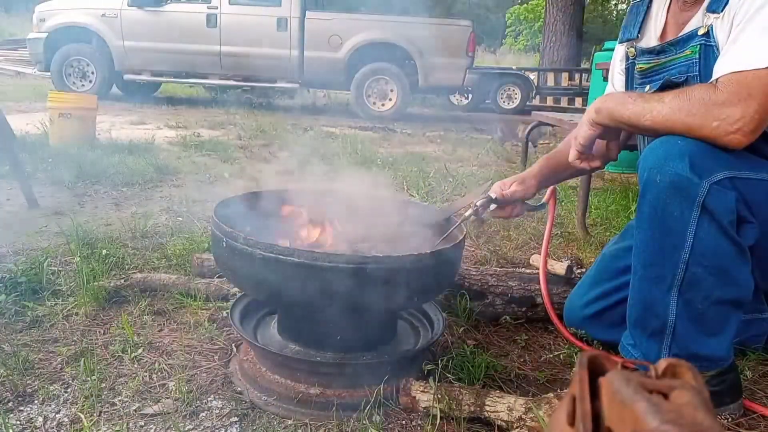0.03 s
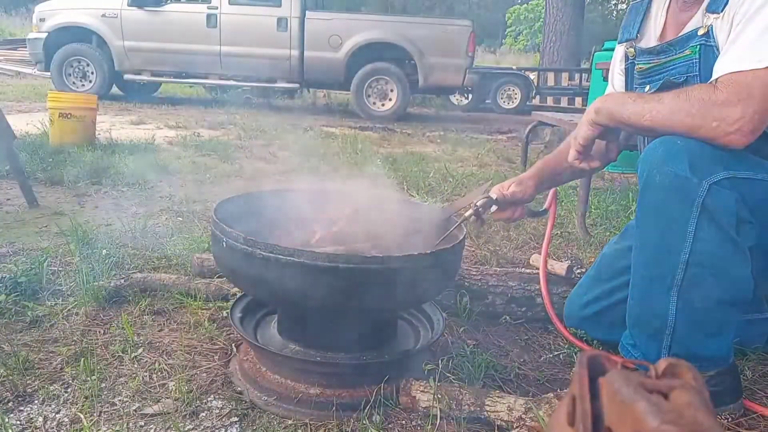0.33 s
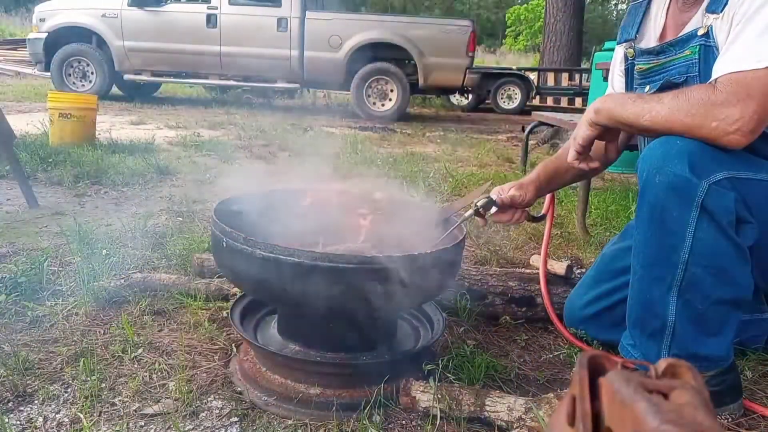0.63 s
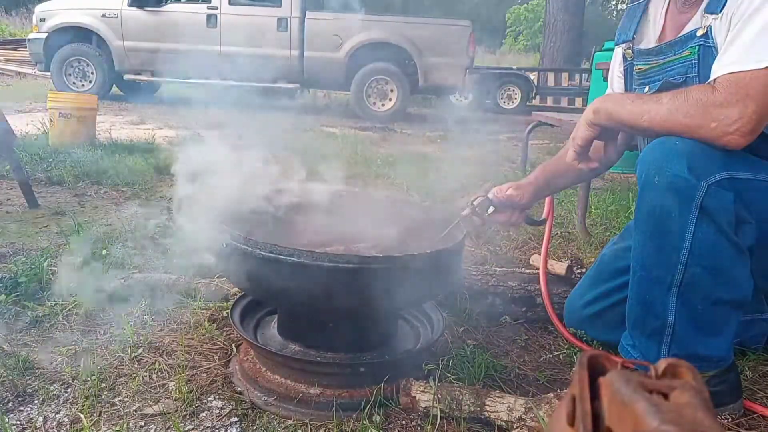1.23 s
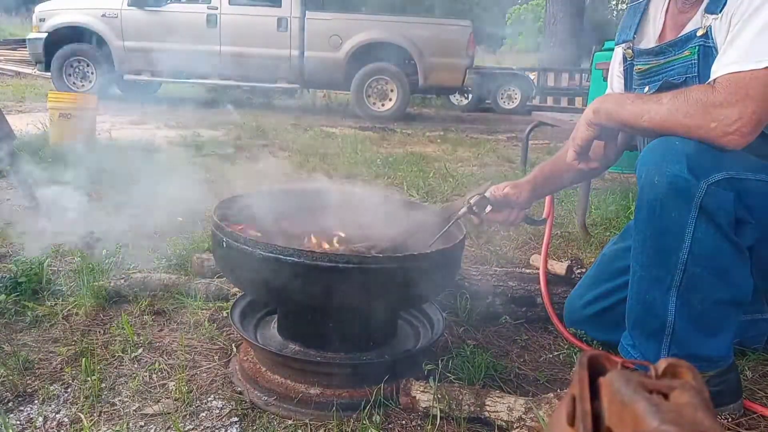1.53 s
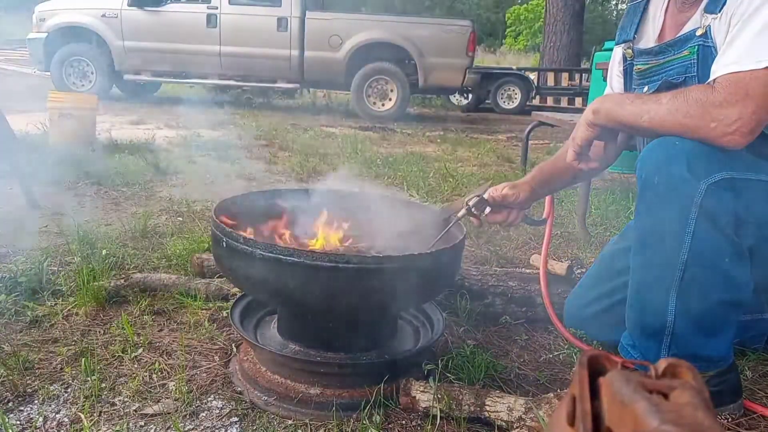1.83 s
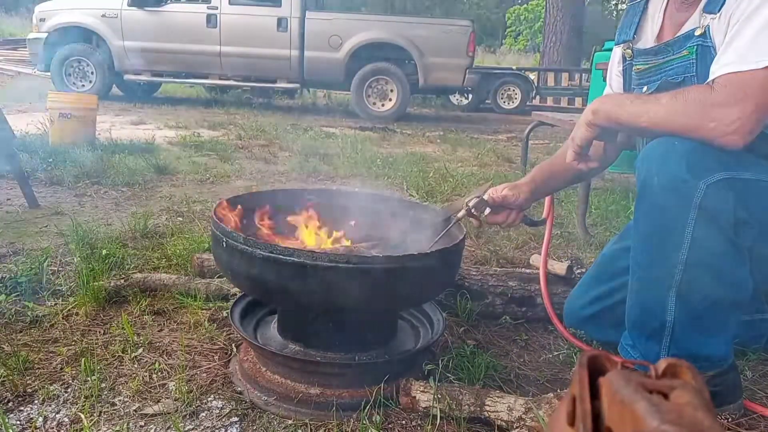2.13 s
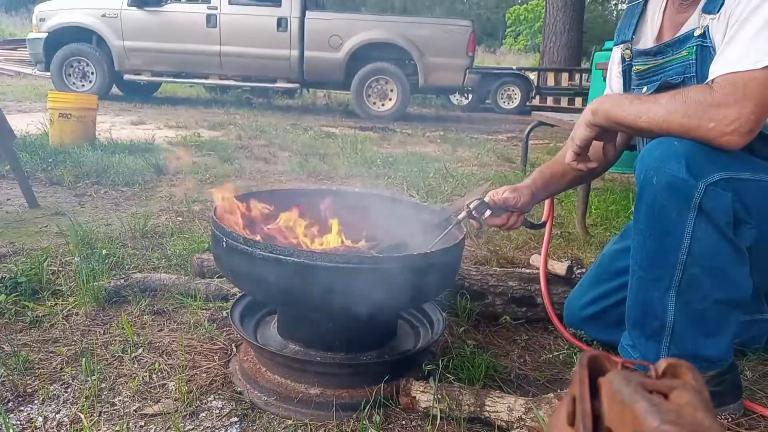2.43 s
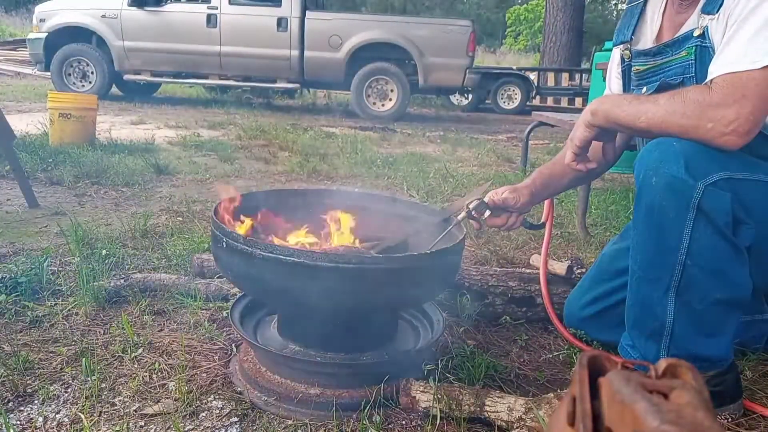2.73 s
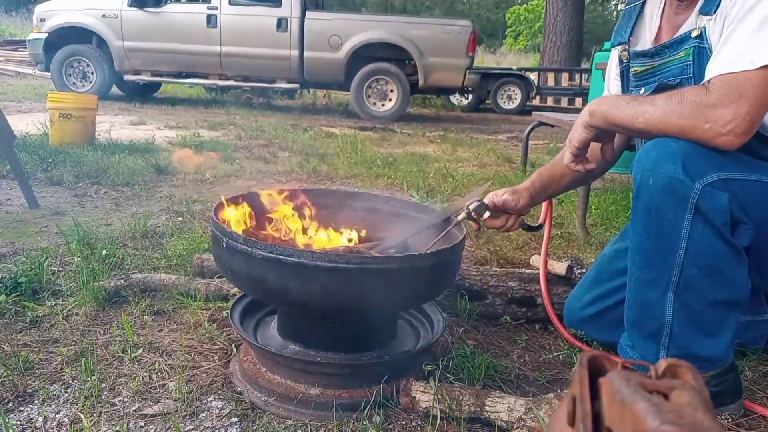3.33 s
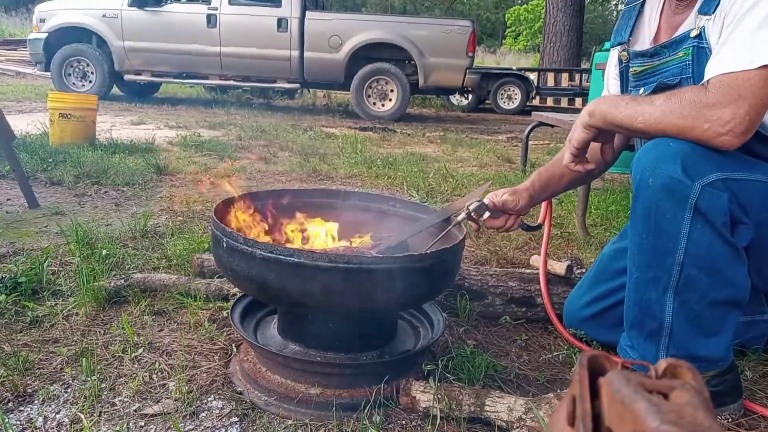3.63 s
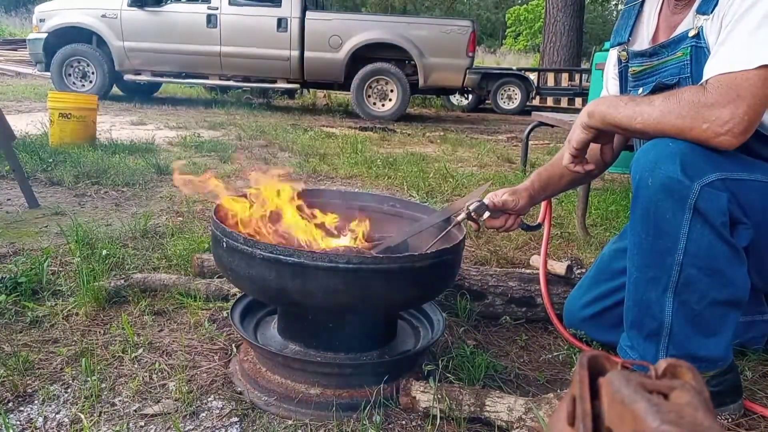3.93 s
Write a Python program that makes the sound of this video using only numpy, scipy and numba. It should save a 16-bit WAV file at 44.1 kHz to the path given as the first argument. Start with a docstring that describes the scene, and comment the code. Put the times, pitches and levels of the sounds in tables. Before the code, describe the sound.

An air jet blowing into forge coals is the main sound, over a small compressor that hums steadily throughout. The air starts with a bright spit at about 0.9 seconds, hissing with a breathy high whistle, strongest from 1.2 to 1.5 seconds. The fanned fire flutters with a low roar from 1 second on. The rush eases after 2 seconds and swells again near 4.

```python
"""Air jet in a forge

An air nozzle on a hose is blown into the coals of a bowl forge outdoors while a small compressor hums nearby.
The turbulent jet opens with a bright spit, rushes through the coals and half whistles on their edges;
the fanned fire builds to a fluttering roar. The pump thrums and its valves chatter once a stroke."""
import sys
import numpy as np
from scipy import signal
from scipy.fft import rfft, irfft
from scipy.io import wavfile
from scipy.ndimage import map_coordinates
from numba import njit

SR = 44100
rng = np.random.default_rng(int(sys.argv[2]) if len(sys.argv) > 2 else 0)


def wav_record(signal):
    """Record a signal, one row per channel, as 16-bit PCM in the file named by sys.argv[1]."""
    frames = np.transpose(np.atleast_2d(signal))
    bounded = np.clip(frames, -1, 1)
    # unit amplitude maps onto the largest positive 16-bit level
    quanta = np.round(bounded * 32767).astype(np.int16)
    wavfile.write(sys.argv[1], SR, quanta)


N = 176400


def jet():
    """Jet noise: turbulence excites the cavities between the coals and hisses at the nozzle."""
    # rush through the coals (time [s], level [dB])
    rush_level = [(.8, -68), (.88, -39.5), (.94, -29), (1.0, -28.5), (1.13, -29.5), (1.29, -32.5),
                  (1.4, -34), (1.7, -33.5), (1.82, -34.5), (2.0, -36.5), (2.5, -41.5), (2.8, -42),
                  (2.95, -39), (3.55, -38.5), (3.75, -36), (4, -33.5)]
    # its spectrum (frequency [Hz], relative density [dB])
    rush_spectrum = [(300, -28), (1200, -6.5), (1900, -3), (2600, -4.5), (3900, -1.5), (4550, -3.5),
                     (5000, -4.5), (6400, -1.5), (7500, -3.5), (8300, -13), (9500, -12), (11500, -20.5),
                     (15500, -22.5)]
    # cavity resonances (frequency [Hz], bandwidth [Hz], level relative to the rush [dB])
    gaps = [(3340, 340, -11.5), (4560, 400, -10), (6450, 540, -13), (7740, 250, -21), (8430, 240, -16),
            (10600, 400, -23), (13400, 850, -23)]
    # hiss at the nozzle (time [s], level [dB])
    hiss_level = [(.87, -65), (.93, -40), (1.0, -31), (1.17, -45), (1.3, -38), (1.37, -50), (1.52, -43),
                  (1.65, -60), (1.9, -51), (2.4, -58), (3.74, -64), (3.87, -50)]
    # its spectrum (frequency [Hz], relative density [dB])
    hiss_spectrum = [(6000, -30), (8300, 6), (9700, -21), (10700, -10), (11600, 0), (12500, -2), (13800, 2),
                     (15500, -4.5)]
    ringing = 0
    for hz, width, db in gaps:
        tone = breathy_tone(hz * (1 + .005 * walk(30)), width)
        sputter_db = .00022 * hz * walk(25)  # the high gaps sputter most
        ringing += tone * undb(db + sputter_db)
    rush = eddies(colour(noise(), rush_spectrum), rate=9.9) + ringing
    rush *= undb(curve(rush_level) + 1.27 * walk(70))
    hiss = eddies(colour(noise(), hiss_spectrum), rate=26) * undb(curve(hiss_level))
    return rush + hiss


def whistle():
    """Edge tone: the jet oscillates on the coals, a narrow self-steadying core in a breathy skirt."""
    # edge tone (time [s], level [dB], centre frequency [Hz])
    edge_tone = [(.88, -52, 5790), (1.04, -35, 5620), (1.225, -24, 5800), (1.31, -29, 5760),
                 (1.41, -32, 5692), (1.47, -24.5, 5720), (1.54, -31.5, 5800), (1.75, -34, 5740),
                 (1.82, -41, 5800), (2.02, -38, 5930), (2.12, -38.5, 5857), (2.25, -46, 5970),
                 (2.46, -45, 5800), (2.58, -40.5, 5870), (2.79, -46, 5950), (2.98, -38, 5673),
                 (3.12, -41.5, 5617), (3.22, -36, 5750), (3.345, -39, 5850), (3.43, -50, 5744),
                 (3.61, -42, 5554), (3.7, -52, 5700), (4, -41, 5800)]
    hz = curve(edge_tone, axis=2) * (1 + .006 * walk(25))
    core = breathy_tone(hz, width_hz=350)
    core = unit(core / np.sqrt(abs(signal.hilbert(core))))  # halves the level swings in dB
    skirt = undb(-3.5) * breathy_tone(hz, width_hz=1000)
    return unit(core + skirt) * undb(curve(edge_tone) + 1.5 * walk(95))


def squeals(sag_hz=150):
    """Transient edge tones: each swells and fades, sagging in pitch, as the jet catches an edge."""
    # squeals (middle time [s], duration [s], frequency [Hz], bandwidth [Hz], peak level [dB])
    catches = [(1.282, 0.053, 3320, 450, -33.5), (1.5, .1, 10550, 500, -44), (1.53, .06, 8600, 400, -37),
               (1.58, .06, 8000, 350, -39), (1.63, 0.12, 9900, 800, -44), (1.65, .11, 7740, 300, -42),
               (1.707, 0.1, 6500, 650, -36), (1.802, .28, 10650, 300, -54), (1.86, .1, 13450, 550, -50),
               (2.0, 0.16, 6400, 800, -37), (3.53, .28, 6800, 600, -44)]
    out = 0
    for middle, length, hz, width, db in catches:
        progress = np.clip((np.arange(N) / SR - middle) / length, -.5, .5)
        out += undb(db) * np.cos(np.pi * progress) * breathy_tone(hz - sag_hz * progress, width)
    return out


def fire():
    """Combustion noise: turbulent flames flutter and roar in the draught."""
    # roar of the fanned fire (time [s], level [dB])
    roar_level = [(.87, -59), (.93, -36), (1.1, -37.5), (1.5, -38.5), (1.8, -36), (2.2, -37), (2.8, -35),
                  (4, -34.5)]
    # its spectrum (frequency [Hz], relative density [dB])
    roar_spectrum = [(30, -39), (60, -21), (110, -11.5), (190, 1), (280, -2.5), (330, -0.5), (430, -10),
                     (500, -9), (600, -9), (1000, -6), (1450, -18.5), (1800, -12), (2600, -37), (6000, -38)]
    flames = eddies(colour(noise(), roar_spectrum), rate=21)
    flutter_db = walk(50)
    return unit(flames * undb(flutter_db)) * undb(curve(roar_level))


def compressor():
    """Cyclic machine noise: one nearly steady rotation times thrum and valves, over broadband fan noise."""
    # pump speed (time [s], stroke rate [Hz])
    stroke_rate = [(0, 73.9), (.6, 73.87), (1.1, 74.18), (1.9, 73.9), (2.4, 73.83), (4, 73.72)]
    # motor fan and open air (frequency [Hz], relative density [dB])
    fan_spectrum = [(25, -44), (50, -17), (95, -4.5), (170, -13), (240, -0.5), (340, -9), (520, 1.5),
                    (700, -5), (1100, -9), (1350, -4.5), (2000, -4.5), (2800, -9), (6000, -18),
                    (15000, -31)]
    blow_at, valve_opens = .27, .36  # turns into the cycle
    turns = np.cumsum(curve(stroke_rate) * (1 + .0005 * walk(8))) / SR
    pump = thrum(turns - blow_at) + valves(turns - valve_opens)
    return pump + undb(-40.5) * colour(noise(), fan_spectrum)


def thrum(turns, body_orders=7):
    """Forced vibration: low stroke harmonics ring the pump body after each blow; upper ones scatter."""
    # harmonics of the pump (multiple of the stroke rate, relative level [dB])
    harmonics = [(1, -41.5), (2, -19.5), (3, -6), (4, -4.5), (5, -9.5), (6, -5), (7, 0.5), (8, -18.5),
                 (9, -19.5), (11, -16.5), (12, -12.5), (13, -21.5), (14, -20), (15, -26.5), (16, -20.5),
                 (18, -21.5), (19, -23), (21, -22.5), (23, -25), (24, -24.5), (26, -21.5), (27, -28),
                 (28, -26), (29, -31), (30, -29.5), (32, -20), (33, -23.5)]
    # thin tones of the casing (multiple of the stroke rate, level on the same scale [dB])
    casing = [(46, -23), (47, -21), (56, -27.5), (59, -24.5)]
    orders, db = np.vstack([harmonics, casing]).T
    log_gain = np.log(undb(np.interp(np.arange(len(harmonics)), orders, db)))
    # minimum phase gathers the energy just after the blow
    ring_phase = -signal.hilbert(np.r_[log_gain, log_gain[-2:0:-1]]).imag
    out = 0
    for i, order in enumerate(orders):
        if i < body_orders:
            phase, waver_db = ring_phase[i + 1], .75 * walk(2.9)
        else:
            phase, waver_db = rng.uniform(0, 2 * np.pi), 1.07 * walk(3.5)
        out += undb(db[i] + waver_db) * np.sin(2 * np.pi * order * turns + phase)
    return undb(-23.5) * unit(out)


def valves(turns, size=600):
    """Periodic excitation: a decaying burst of chatter each stroke, mostly alike, partly fresh hiss."""
    # valve chatter (frequency [Hz], relative density [dB])
    chatter_spectrum = [(2300, -50), (2600, -7), (3000, -6.5), (3430, -4.5), (3800, -3.5), (4100, -17),
                        (4400, -3.5), (4900, -19), (5350, 1.5), (5800, -11), (6600, 2.5), (7600, -14),
                        (8300, -4.5), (9150, -17.5), (9550, -11), (10500, -27), (12500, -17), (15500, -29)]
    decay_turns, jitter_turns, leak, fresh_share = .24, .0006, .14, .13
    phase = (turns + jitter_turns * walk(110)) % 1
    gate = lambda p: leak + np.exp(-p / decay_turns)
    burst = rfft(rng.standard_normal(size) * gate(np.arange(size) / size))
    stroke = irfft(burst / np.sqrt(abs(burst)))  # one cycle, its spectrum partly flattened
    alike = unit(map_coordinates(stroke, [phase * size], order=5, mode="grid-wrap"))
    fresh = unit(noise() * gate(phase))
    chatter = np.sqrt(1 - fresh_share) * alike + np.sqrt(fresh_share) * fresh
    return undb(-41) * colour(chatter, chatter_spectrum)


def eddies(x, rate, count=48, spread_db=2):
    """Turbulent modulation: each narrow band swells and sinks on its own; rms 1."""
    place = np.sqrt(np.fft.rfftfreq(N, 1 / SR) / (SR / 2)) * (count - 1)
    spectrum = rfft(x)
    bands = (irfft(spectrum * np.maximum(1 - abs(place - k), 0), N) for k in range(count))
    return unit(sum(band * undb(spread_db * walk(rate)) for band in bands))


def breathy_tone(hz, width_hz):
    """Noise-driven resonance, its sides steepened by a second, wider stage; rms 1."""
    return unit(resonance(resonance(noise(), hz, width_hz), hz, 2 * width_hz))


@njit
def resonance(x, hz, width_hz):
    """Damped resonator: a state-variable band-pass with a moving centre."""
    y, band_state, low_state = np.empty(len(x)), 0., 0.
    for i in range(len(x)):
        tuning, damping = np.tan(np.pi * hz[i] / SR), width_hz / hz[i]
        band = (band_state + tuning * (x[i] - low_state)) / (1 + tuning * (tuning + damping))
        band_state = 2 * band - band_state
        low_state += 2 * tuning * band
        y[i] = damping * band
    return y


def colour(x, points):
    """Spectral shaping by (frequency [Hz], relative gain [dB]) points; rms 1."""
    hz, db = np.array(points, float).T
    f = np.maximum(np.fft.rfftfreq(N, 1 / SR), 1)
    gain = undb(np.interp(np.log(f), np.log(hz), db))
    return unit(irfft(rfft(x) * gain, N))


def walk(rate):
    """Low-passed noise that changes about rate times a second; rms 1."""
    f = np.fft.rfftfreq(N, 1 / SR)
    return unit(irfft(rfft(noise()) / (1 + (2 * f / rate) ** 2) ** 2, N))


def noise():
    """Gaussian white noise."""
    return rng.standard_normal(N)


def curve(rows, axis=1):
    """Linear interpolation of one column of a time table."""
    rows = np.array(rows, float)
    return np.interp(np.arange(N) / SR, rows[:, 0], rows[:, axis])


def undb(db):
    """Decibels to amplitude ratio."""
    return 10 ** (np.asarray(db) / 20)


def unit(x):
    """Normalisation to rms 1."""
    return x / np.sqrt(np.mean(x ** 2))


def scene():
    """Superposition of the sources in the open air, the same in both channels."""
    return np.tile(compressor() + jet() + whistle() + squeals() + fire(), (2, 1))


def record(dry, top_hz=15750):
    """Band limiting: a steep elliptic low-pass cuts the highest treble."""
    return signal.sosfilt(signal.ellip(12, .1, 90, top_hz, fs=SR, output="sos"), dry)


dry = scene()
out = record(dry)
wav_record(out)
```